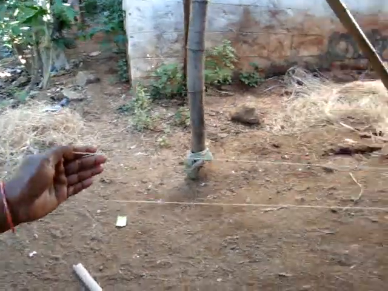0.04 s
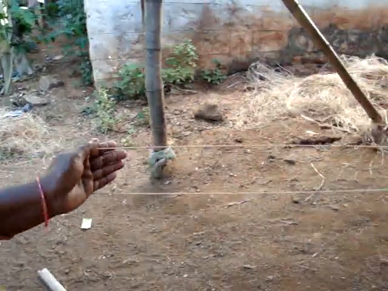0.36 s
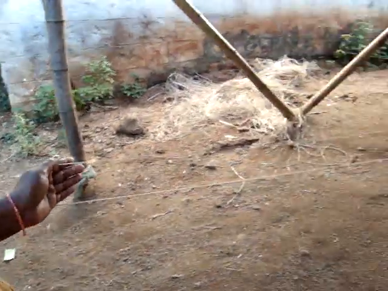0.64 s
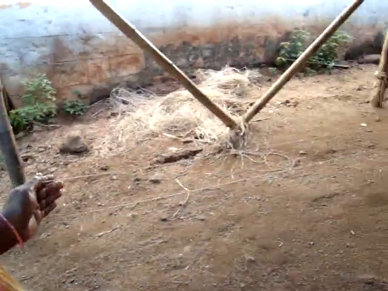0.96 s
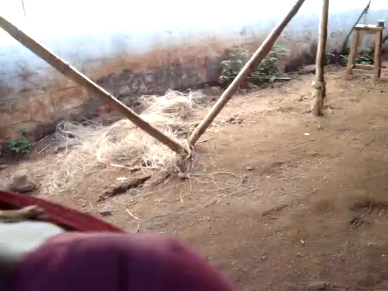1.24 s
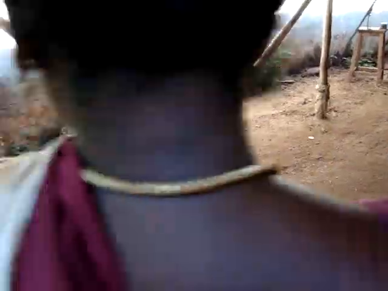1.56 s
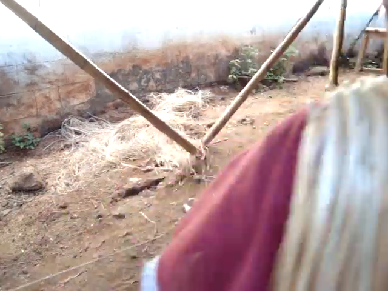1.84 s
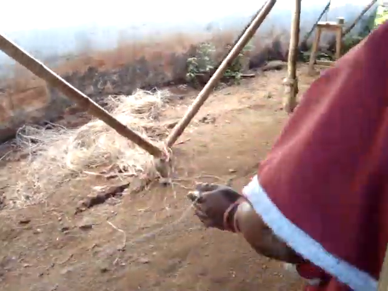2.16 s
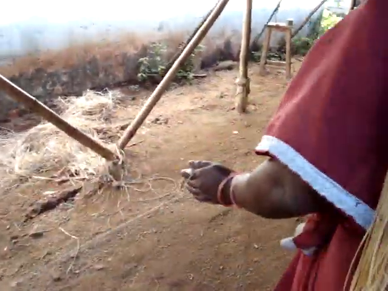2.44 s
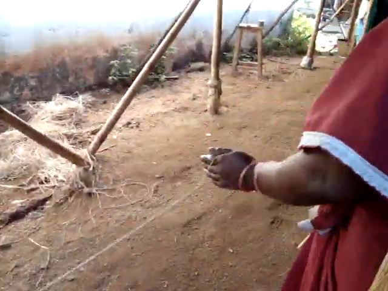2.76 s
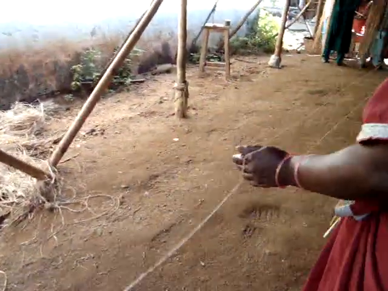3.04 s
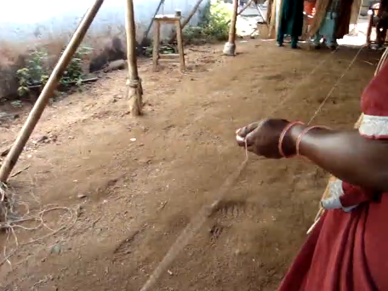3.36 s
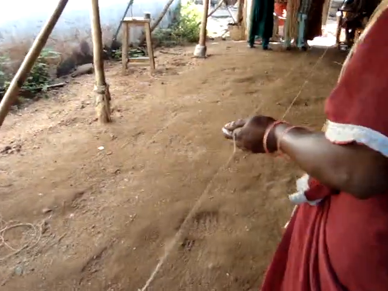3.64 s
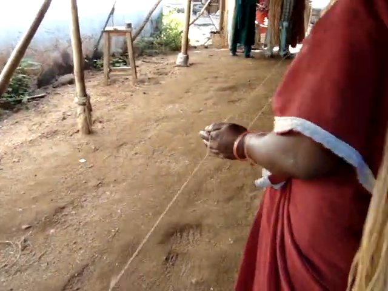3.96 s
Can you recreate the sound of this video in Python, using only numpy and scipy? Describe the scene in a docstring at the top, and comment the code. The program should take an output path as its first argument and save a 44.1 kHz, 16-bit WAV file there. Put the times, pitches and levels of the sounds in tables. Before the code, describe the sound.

A rope-twisting machine rattles and whirs loudly and continuously in an open yard.

```python
"""A rope-twisting machine rattles across an open yard. Its spinning hooks chatter in loose metal bearings:
a dense stream of tiny impacts that pulses with each turn and comes in surges. Small blows keep the frame
ringing and the stand clattering; friction makes the spindles whine and metal parts squeal briefly.
A few soft thuds pass underneath, and something knocks near the end."""
import sys
import numpy as np
from scipy import signal
from scipy.fft import rfft, irfft
from scipy.io import wavfile
from scipy.ndimage import uniform_filter1d

SR = 44100
rng = np.random.default_rng(int(sys.argv[2]) if len(sys.argv) > 2 else 0)


def master_out(mix):
    """Clip the mix to full scale and print it as 16-bit PCM to the path in sys.argv[1]."""
    frames = np.transpose(np.atleast_2d(mix))
    ceiling = np.clip(frames, -1, 1)
    pcm = np.round(ceiling * 32767).astype(np.int16)
    wavfile.write(sys.argv[1], SR, pcm)


N = 176400
TIME_S = np.arange(N) / SR


def undb(db):
    """Decibels to gain."""
    return np.exp(np.asarray(db) * np.log(10) / 20)


def unit(x):
    """Scale to rms 1."""
    return x / np.sqrt(np.mean(x ** 2))


def curve(rows):
    """Join (t/s, value) rows by straight lines."""
    return np.interp(TIME_S, *np.array(rows).T)


def swell(middle_s, length_s):
    """Rounded rise, hold and fall; peak 1."""
    away = np.minimum(np.square(2 * (TIME_S - middle_s) / length_s), 8)
    return np.exp(-np.square(away) / 2)


def walk(rate_hz):
    """Smooth random drift, spread near 1."""
    hold = max(int(SR / rate_hz), 2)
    steps = np.repeat(rng.standard_normal(N // hold + 1), hold)
    return 1.3 * uniform_filter1d(uniform_filter1d(steps, hold), hold)[:N]


def colour(x, points, size=4096):
    """Minimum-phase filter through (f/Hz, level/dB) points; output rms 1."""
    hz, db = np.array(points).T
    bins_hz = np.maximum(np.arange(size // 2 + 1) * SR / size, 1)
    cepstrum = irfft(np.log(undb(np.interp(np.log(bins_hz), np.log(hz), db))))
    cepstrum[1:size // 2] *= 2
    cepstrum[size // 2 + 1:] = 0
    response = irfft(np.exp(rfft(cepstrum)))
    return unit(signal.fftconvolve(x, response)[:N])


def band(x, hz, width_hz):
    """Broad resonance; output rms 1."""
    edges_hz = np.clip([hz - width_hz / 2, hz + width_hz / 2], SR / 100, SR / 3)
    return unit(signal.sosfilt(signal.butter(2, edges_hz, "band", fs=SR, output="sos"), x))


def ring(x, hz, t60_s):
    """One decaying mode driven by x; output rms 1."""
    pole = np.exp((2j * np.pi * hz - np.log(1000) / t60_s) / SR)
    return unit(signal.lfilter([1, -1], [1, -pole], x).imag)


def impacts(turn, per_s, spread_db):
    """Random contacts of uneven strength, denser and harder once a turn."""
    hit = rng.random(N) < per_s / SR * turn
    sign = rng.choice([-1, 1], N)
    strength = undb(spread_db * np.clip(rng.standard_normal(N), -2, 2))
    return hit * sign * strength * np.sqrt(turn)


def friction_tone(hz, waver_hz):
    """Rough tone wavering in pitch and strength; rms 1."""
    cycles = np.cumsum(hz + waver_hz * walk(330)) / SR
    flicker_db = 2.2 * walk(90)
    return unit(np.sin(2 * np.pi * cycles) * undb(flicker_db))


def slack():
    """Gain of the rattling, which eases briefly between surges."""
    dips = [(0.122, 0.017, -11), (0.84, 0.01, -1), (1.4, 0.05, -3), (1.732, 0.035, -2.5),
            (1.887, 0.025, -5), (2.02, .06, -2), (2.287, 0.021, -4.5), (2.406, 0.061, -2.5),
            (2.535, 0.047, -3), (2.694, 0.041, -5.5), (2.822, 0.015, -4.5)]  # middle/s, length/s, gain/dB
    return undb(sum(db * swell(middle_s, length_s) for middle_s, length_s, db in dips))


def scatter(x, t60_s=.2, wet_db=-11):
    """Direct sound plus faint reflections from ground, posts and wall; keeps the level."""
    t = TIME_S[:SR // 4]
    tail = rng.standard_normal(len(t)) * np.exp(-np.log(1000) * t / t60_s)
    wet = signal.fftconvolve(x, tail / np.linalg.norm(tail))[:N]
    return (x + undb(wet_db) * wet) / np.hypot(1, undb(wet_db))


def yard_air(level_db=-82):
    """Quiet air of the yard, mostly low rumble."""
    # f/Hz, level/dB
    spectrum = [(20, -1.5), (45, 19), (90, 6), (140, -1.5), (400, -3), (2000, -22), (10000, -29)]
    return undb(level_db) * colour(rng.standard_normal(N), spectrum)


def thuds(rise_s=.03, waver_hz=15):
    """Soft low bumps that swell and die away."""
    bumps = [(.46, 217, -54), (.585, 177, -52), (1.59, 182, -55), (1.86, 404, -45.5), (2.795, 168, -54),
             (3.88, 183, -52)]  # t/s, f/Hz, level/dB
    out = 0
    for start_s, hz, db in bumps:
        age = np.maximum(TIME_S - start_s, 0) / rise_s
        cycles = np.cumsum(hz + waver_hz * walk(110)) / SR
        out += undb(db) * age * np.exp(1 - age) * np.sin(2 * np.pi * cycles)
    return out


def knock(t60_s=.13):
    """Dull knock of several quick contacts."""
    contacts = [(3.912, -33), (3.926, -32.5), (3.936, -26), (3.948, -31.5), (3.961, -34)]  # t/s, level/dB
    spectrum = [(40, -47), (100, -28), (250, -7), (400, 5.5), (620, 6.5), (830, 12.5), (1050, 7), (1450, 5),
                (2500, -3), (6000, -33)]  # f/Hz, level/dB
    envelope = 0
    for start_s, db in contacts:
        age_s = np.maximum(TIME_S - start_s, 0)
        envelope += undb(db - 60 * age_s / t60_s) * (TIME_S >= start_s)
    rms = np.sqrt(np.mean(envelope ** 2))
    return rms * colour(envelope * rng.standard_normal(N), spectrum)


def stand(turn):
    """The shaken stand clatters dully and rings in four hollow modes; the upper pair grows later."""
    clatter_spectrum = [(40, -45), (100, -23.5), (170, -16.5), (290, -9.5), (350, -8), (480, -2),
                        (650, -2.5), (900, -0.5), (1200, 2), (1500, -9), (2200, -23.5), (3200, 0),
                        (6000, -12)]  # f/Hz, level/dB
    clatter_level = [(0, -40.5), (.4, -38), (.7, -37.5), (1.15, -37.5), (1.5, -35.5), (1.8, -38.5),
                     (2.2, -38.5), (2.6, -39.5), (3, -36), (3.25, -43), (3.42, -38), (3.7, -35.5), (4, -38)]  # t/s, level/dB
    modes_hz = [232, 326, 453, 500]  # f/Hz
    mode_decays = [(.3, -67), (0.5, -59.5), (0.54, -51), (.2, -55.5)]  # t60/s, level/dB
    lower_gain = [(0, -1), (.7, 1.5), (1.2, -6), (2.5, -7), (4, -1.5)]  # t/s, gain/dB
    upper_gain = [(0, -9), (.7, -6), (1.4, -10), (1.8, 0.5), (2.05, -9), (2.6, -10), (2.8, 1.5), (3.2, 0.5),
                  (3.6, 2), (4, -6)]  # t/s, gain/dB
    shakes = impacts(turn, per_s=3300, spread_db=.5)
    clatter = colour(shakes, clatter_spectrum) * undb(curve(clatter_level))
    blows = impacts(turn, per_s=700, spread_db=4.5)
    modes = [undb(db) * ring(blows, hz, t60_s) for hz, (t60_s, db) in zip(modes_hz, mode_decays)]
    return clatter + sum(modes[:2]) * undb(curve(lower_gain)) + sum(modes[2:]) * undb(curve(upper_gain))


def loose_parts(turn):
    """Midrange rattle that sets in as the machine works harder."""
    spectrum = [(60, -58), (500, -14), (1000, -18.5), (1400, -1.5), (1650, 1), (1950, 3), (2300, 0),
                (2700, 2.5), (4000, -13.5), (10000, -52)]  # f/Hz, level/dB
    level = [(0, -40), (0.19, -43.5), (.55, -43.5), (.78, -42), (.88, -36.5), (1.18, -34.5), (1.42, -37),
             (1.56, -42), (1.64, -34), (1.8, -32.5), (1.9, -41), (2.15, -37.5), (2.47, -36.5), (2.56, -42),
             (2.77, -36), (3.26, -37), (3.38, -32), (3.6, -37), (4, -39.5)]  # t/s, level/dB
    contacts = impacts(turn, per_s=2000, spread_db=4.5)
    return colour(contacts, spectrum) * undb(curve(level)) * slack()


def frame(turn, flicker_db=.9, low_cut_hz=290):
    """Small blows ring the metal frame; each mode flickers as the contacts shift."""
    modes_hz = [870, 1080, 1137, 1268, 1329, 1353, 1418, 1841, 1920, 1976, 2075, 2276, 2385, 2460, 2633,
                2745, 2835, 2910, 3258, 4124, 4410, 4511, 4680, 4865, 4990, 5125, 5233, 5410, 5680]  # f/Hz
    mode_decays = [(.06, -53), (0.16, -55.5), (0.11, -47.5), (0.078, -48.5), (0.32, -44.5), (0.15, -47),
                   (0.14, -52.5), (0.2, -52), (.14, -54.5), (.25, -50), (0.36, -51), (0.11, -49.5),
                   (0.05, -45), (0.18, -45), (0.14, -49.5), (.12, -41.5), (0.088, -41), (0.084, -50.5),
                   (0.071, -48.5), (.2, -46.5), (0.25, -41), (0.38, -46.5), (0.13, -57), (0.24, -42),
                   (.14, -46), (.12, -45), (.18, -60), (0.1, -45), (0.27, -46)]  # t60/s, level/dB
    overall_gain = [(0, 0), (.2, -3), (.5, 2), (.8, -0.5), (1.1, 4.5), (1.7, 4), (2, 2), (2.55, 0),
                    (3.1, 2), (3.6, 2), (4, 2)]  # t/s, gain/dB
    middle_gain = [(0, -1.5), (1.4, -1.5), (2.2, 1.5), (2.9, 1.5), (4, 1)]  # middle modes only: t/s, gain/dB
    blows = impacts(turn, per_s=1000, spread_db=2)
    ringing = 0
    for hz, (t60_s, db) in zip(modes_hz, mode_decays):
        lift_db = curve(middle_gain) if 1800 < hz < 3300 else 0
        ringing += undb(db + lift_db + flicker_db * walk(10)) * ring(blows, hz, t60_s)
    bass_cut = signal.butter(2, low_cut_hz, "high", fs=SR, output="sos")  # the ringing carries little bass
    return signal.sosfilt(bass_cut, ringing) * undb(curve(overall_gain))


def whine():
    """Thin friction whine of the spindles."""
    level = [(0, -48), (.55, -45), (.68, -41), (.9, -36), (1.03, -38), (1.3, -38), (1.4, -47), (1.62, -34),
             (1.74, -43), (2, -38), (2.5, -51.5), (3.05, -44), (4, -48)]  # t/s, level/dB
    return friction_tone(hz=3812, waver_hz=30) * undb(curve(level))


def squeals():
    """Rubbing metal parts sing out briefly."""
    events = [(.36, 0.11, 2780, -36), (0.806, 0.042, 2820, -31), (1.023, 0.07, 2830, -32.5),
              (1.234, 0.054, 2830, -34), (1.825, 0.053, 1292, -37), (2.193, 0.046, 2770, -34),
              (2.45, .05, 2770, -33), (2.774, 0.07, 2820, -33.5), (2.93, 0.077, 2767, -40),
              (3.085, 0.34, 2805, -37), (3.11, 0.19, 3250, -32), (3.334, 0.11, 1264, -39),
              (3.443, 0.081, 1123, -36.5), (3.375, 0.16, 2840, -36), (3.715, 0.12, 2875, -34),
              (3.703, 0.13, 3262, -33)]  # middle/s, length/s, f/Hz, level/dB
    return sum(undb(db) * swell(middle_s, length_s) * friction_tone(hz, waver_hz=45)
               for middle_s, length_s, hz, db in events)


def crackle(turn, flutter_db=2.1):
    """Tiny contacts make a fine crackle in the treble."""
    spectrum = [(60, -78), (1500, -44.5), (5000, -32.5), (6400, 0), (7600, 1.5), (8800, 0.5), (10200, -9.5)]  # f/Hz, level/dB
    level = [(0, -33.5), (.13, -36), (.33, -35.5), (.48, -39.5), (.63, -32.5), (.8, -35), (.88, -31),
             (1.3, -31.5), (1.41, -33), (1.5, -29), (1.95, -34), (2.2, -29.5), (2.47, -30), (2.54, -34),
             (2.9, -31), (3.07, -32.5), (3.45, -33.5), (3.7, -31.5), (4, -35)]  # t/s, level/dB
    contacts = impacts(turn, per_s=10000, spread_db=1.5)
    return colour(contacts, spectrum) * undb(curve(level) + flutter_db * walk(110)) * slack()


def scraping(turn):
    """Surges of harder scraping, each in its own band."""
    surges = [(.01, 0.025, 5140, 4020, -28), (0.298, 0.023, 3970, 1500, -29),
              (1.025, 0.041, 4600, 2200, -23), (1.187, 0.028, 4100, 3800, -22.5),
              (1.546, .1, 4720, 1100, -25), (1.651, .076, 3900, 2200, -27), (1.69, 0.036, 5450, 1000, -25),
              (1.81, 0.094, 4500, 2600, -27), (1.916, .026, 4850, 1800, -23.5),
              (1.965, 0.043, 4640, 1600, -26.5), (2.155, 0.1, 4440, 3000, -23.5),
              (2.328, 0.018, 6050, 4000, -26.5), (2.368, 0.027, 3930, 900, -27),
              (2.47, 0.049, 2590, 600, -33), (2.475, 0.026, 5000, 1400, -27.5),
              (2.672, 0.038, 4630, 1400, -25), (2.763, 0.08, 4940, 1500, -23.5),
              (2.848, 0.041, 5130, 900, -25), (2.999, 0.073, 4620, 1700, -26),
              (3.092, 0.13, 5250, 3000, -27.5), (3.39, 0.12, 4900, 2000, -27)]  # middle/s, length/s, f/Hz, width/Hz, level/dB
    contacts = impacts(turn, per_s=9000, spread_db=2.2)
    return sum(undb(db) * swell(middle_s, length_s) * band(contacts, hz, width_hz)
               for middle_s, length_s, hz, width_hz, db in surges)


def chatter(turn, gain_db=2, flutter_db=.7):
    """The hooks strike their loose bearings in a dense stream."""
    spectrum = [(60, -78.5), (300, -59.5), (900, -23.5), (1600, -29.5), (2000, -16.5), (2400, -1.5),
                (3100, -7.5), (3700, 1), (4400, -0.5), (5100, 3.5), (5800, 2), (6300, -8.5), (7500, -14),
                (10200, -21.5)]  # one impact: f/Hz, level/dB
    level = [(0, -34), (.12, -32.5), (.25, -38.5), (.31, -31), (.48, -36.5), (.65, -31.5), (.8, -30.5),
             (.93, -28.5), (1.25, -27), (1.4, -28), (1.6, -26), (1.75, -29.5), (2.28, -28.5), (2.55, -29),
             (2.8, -28.5), (3.1, -32), (3.45, -28.5), (3.85, -32.5), (4, -25)]  # t/s, level/dB
    contacts = impacts(turn, per_s=9000, spread_db=2.2)
    return colour(contacts, spectrum) * undb(gain_db + curve(level) + flutter_db * walk(23.5)) * slack()


def machine(turn_hz=43.5, wander=.06, depth=.12):
    """The hooks spin at a wandering speed and bunch the impacts of every part once a turn."""
    turns = np.cumsum(turn_hz * (1 + wander * walk(6.4))) / SR
    turn = 1 + depth * np.sin(2 * np.pi * turns)
    bearings = chatter(turn)
    treble = crackle(turn)
    surges = scraping(turn)
    tones = squeals() + whine()
    hooks = scatter(bearings + surges) + treble + tones
    return hooks + frame(turn) + loose_parts(turn) + stand(turn)


def scene():
    """Machine, thuds, knock and yard air; mono."""
    return (machine() + thuds() + knock() + yard_air())[None]


def record(dry):
    """Steep low-pass."""
    top_hz = 10150
    return signal.sosfilt(signal.ellip(12, .1, 90, top_hz, fs=SR, output="sos"), dry)


dry = scene()
out = record(dry)
master_out(out)
```